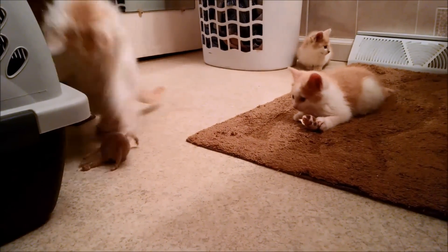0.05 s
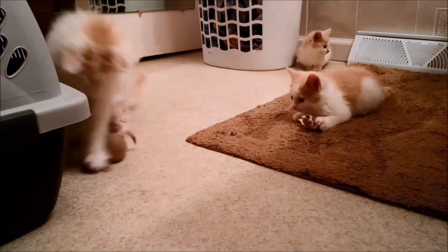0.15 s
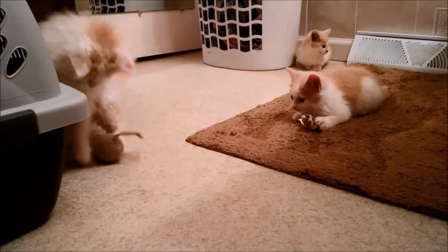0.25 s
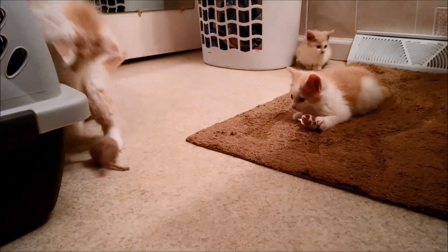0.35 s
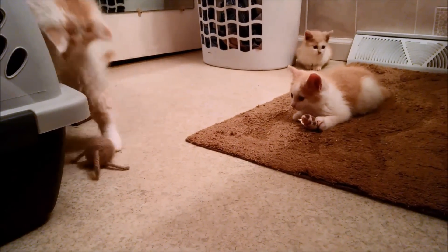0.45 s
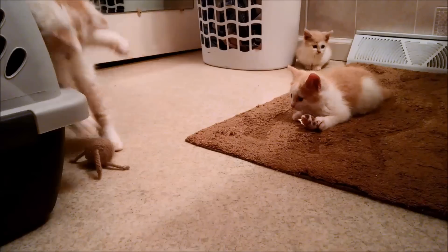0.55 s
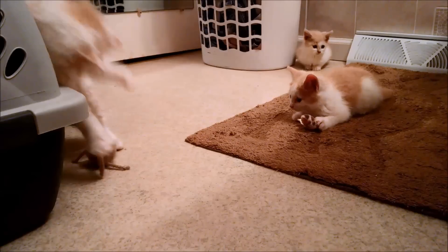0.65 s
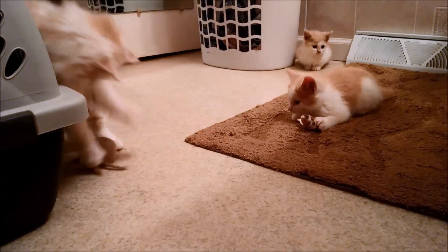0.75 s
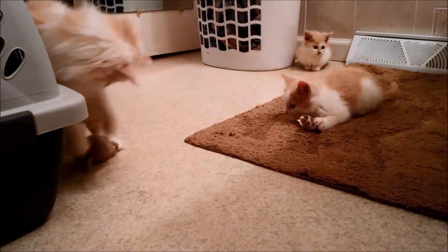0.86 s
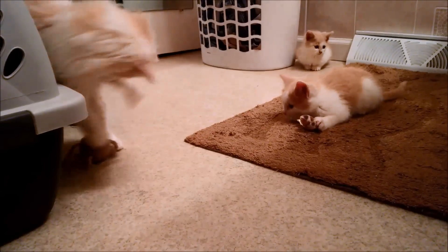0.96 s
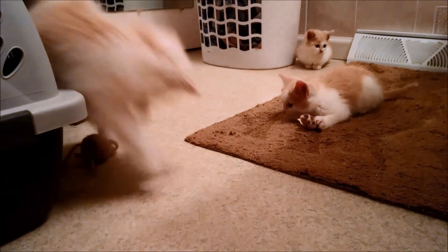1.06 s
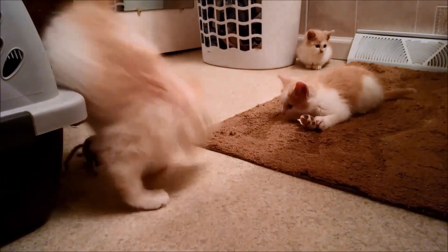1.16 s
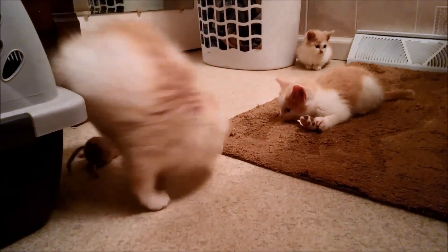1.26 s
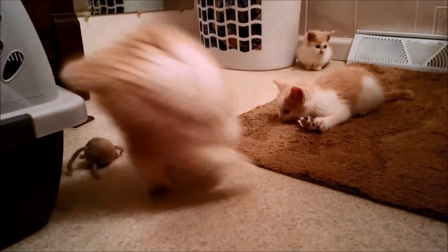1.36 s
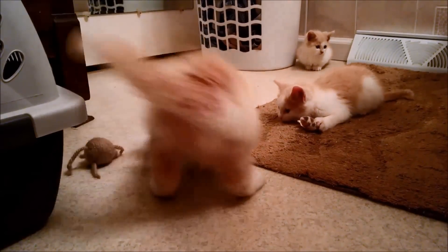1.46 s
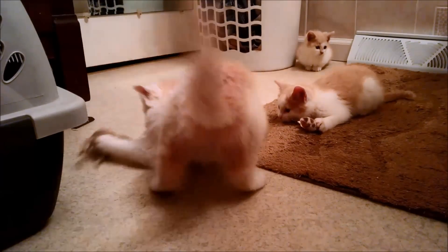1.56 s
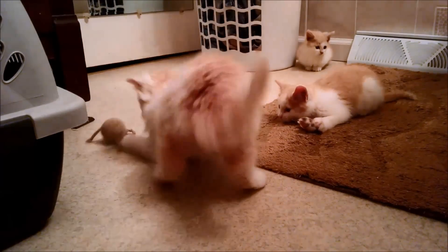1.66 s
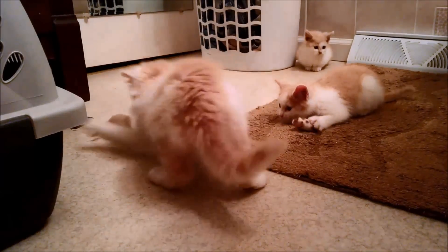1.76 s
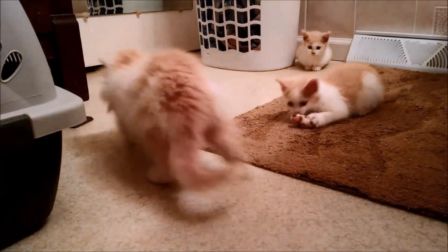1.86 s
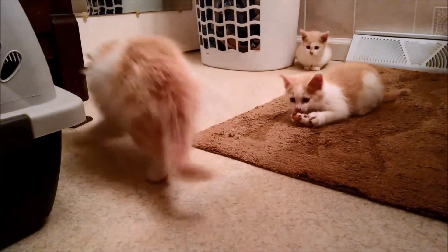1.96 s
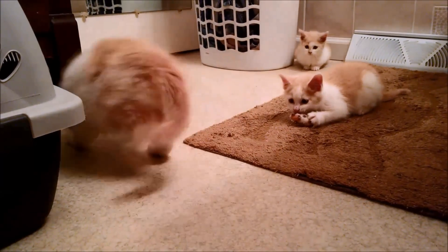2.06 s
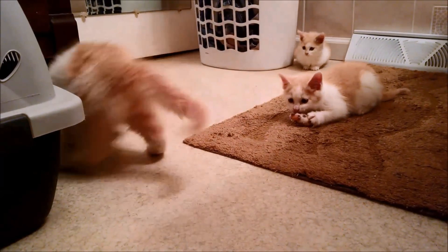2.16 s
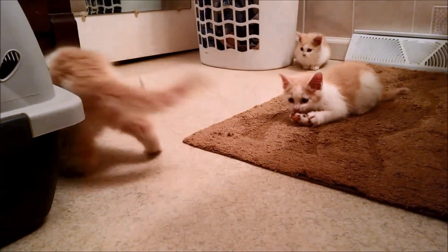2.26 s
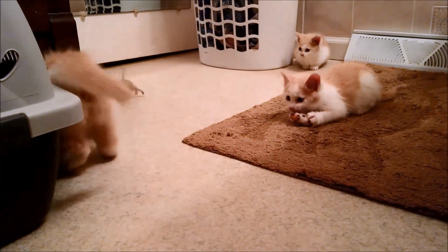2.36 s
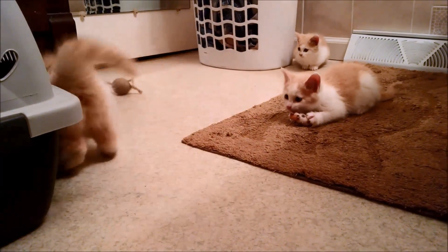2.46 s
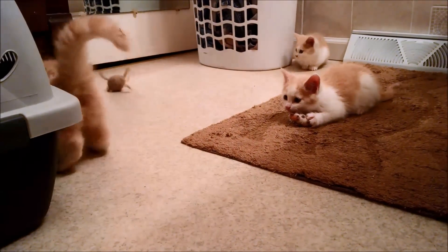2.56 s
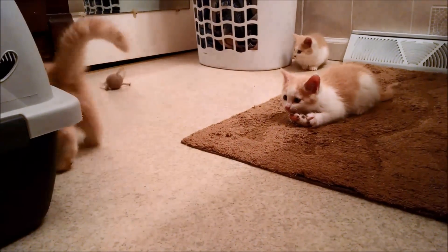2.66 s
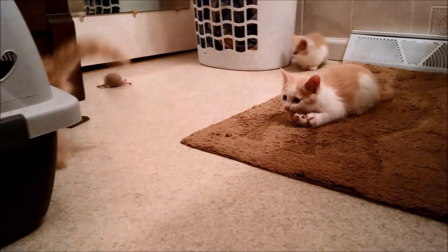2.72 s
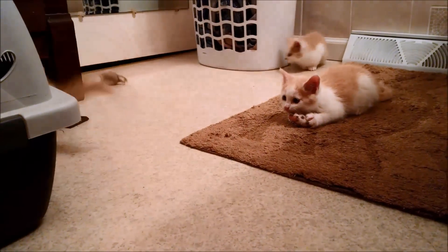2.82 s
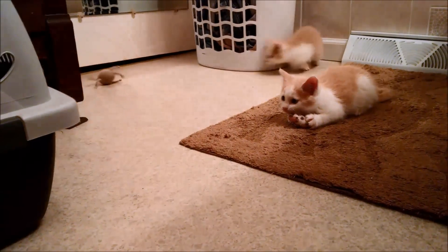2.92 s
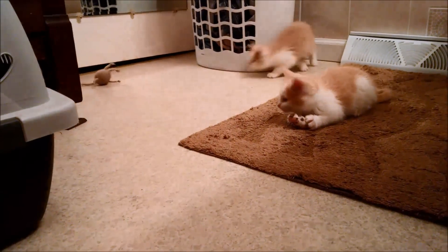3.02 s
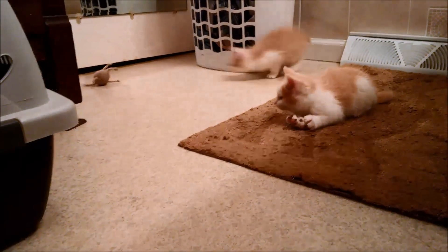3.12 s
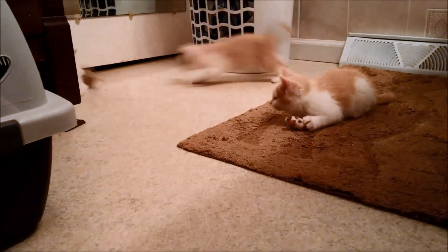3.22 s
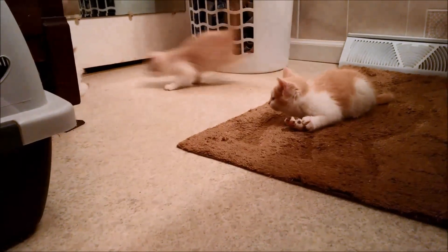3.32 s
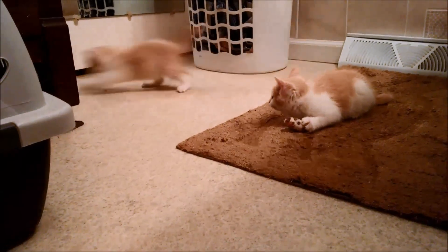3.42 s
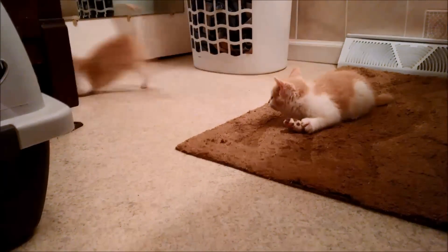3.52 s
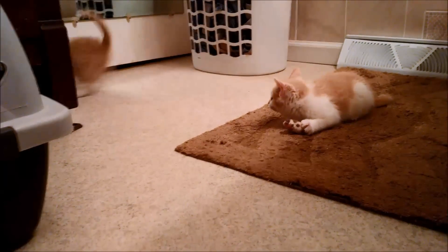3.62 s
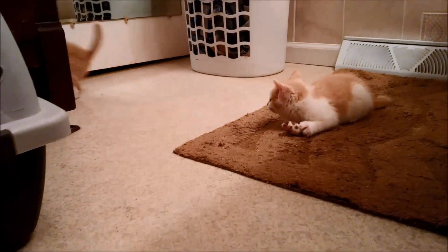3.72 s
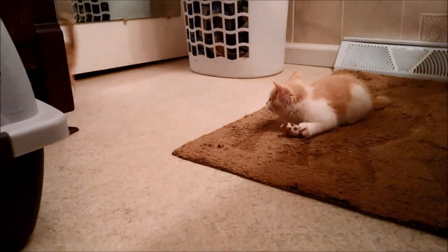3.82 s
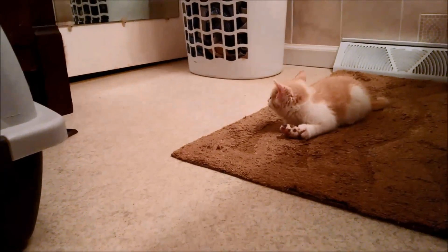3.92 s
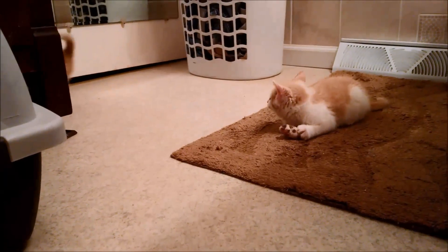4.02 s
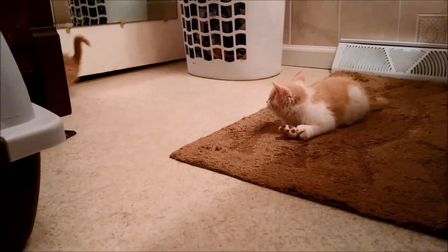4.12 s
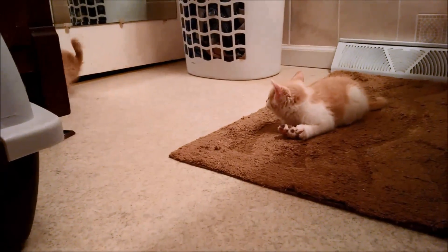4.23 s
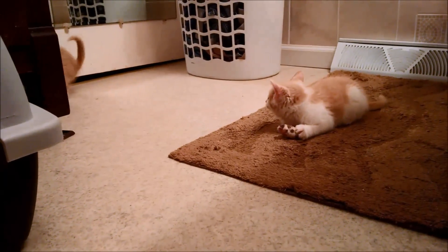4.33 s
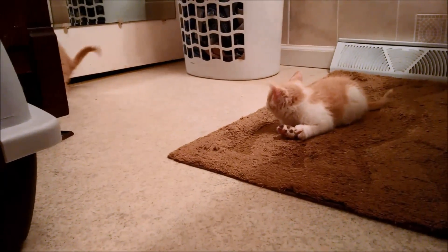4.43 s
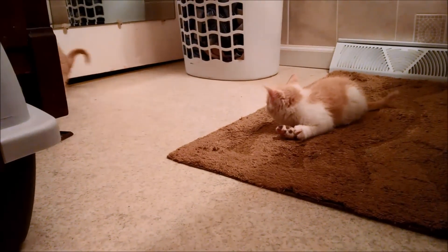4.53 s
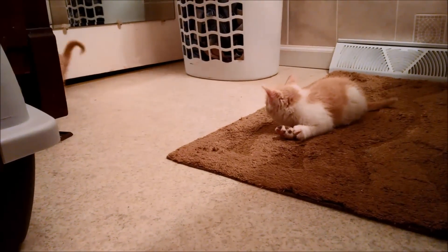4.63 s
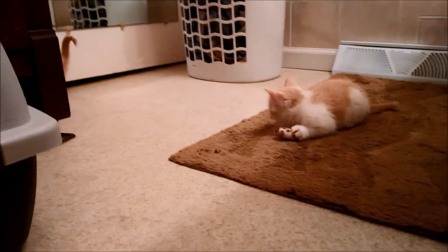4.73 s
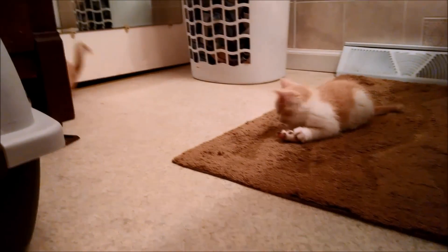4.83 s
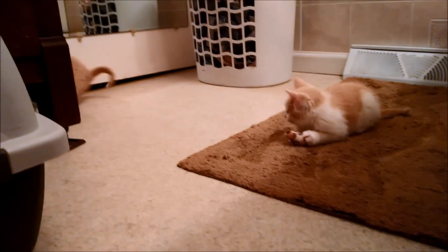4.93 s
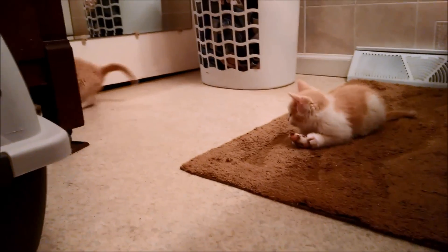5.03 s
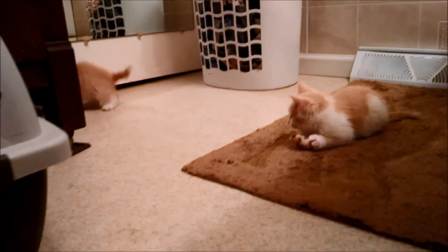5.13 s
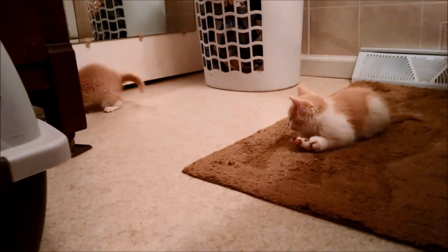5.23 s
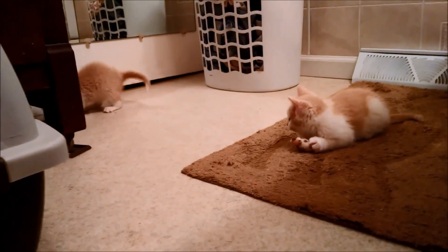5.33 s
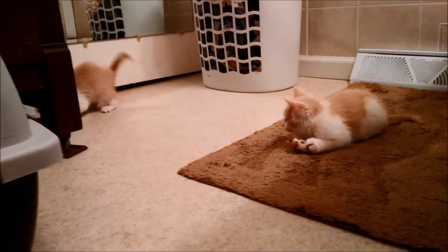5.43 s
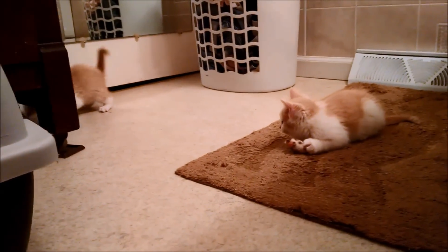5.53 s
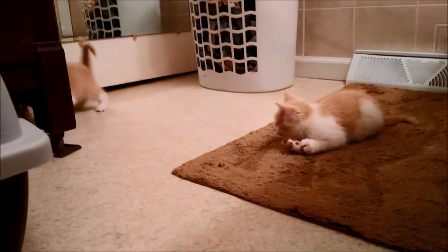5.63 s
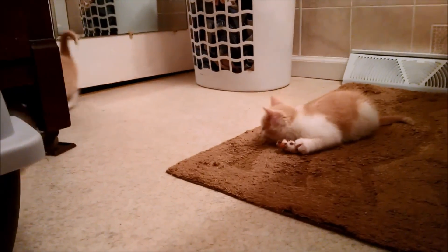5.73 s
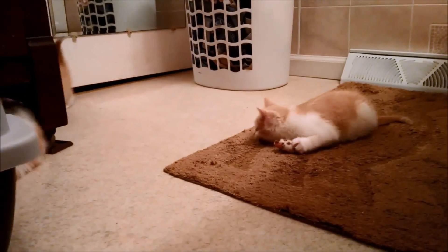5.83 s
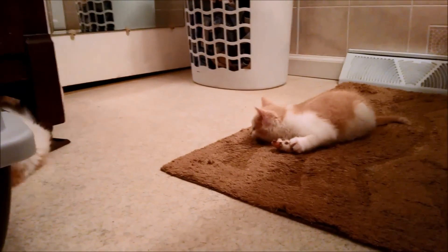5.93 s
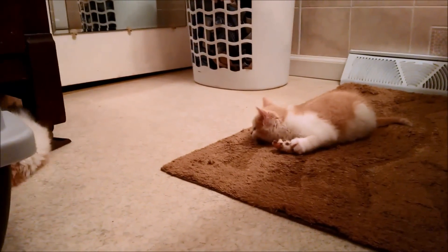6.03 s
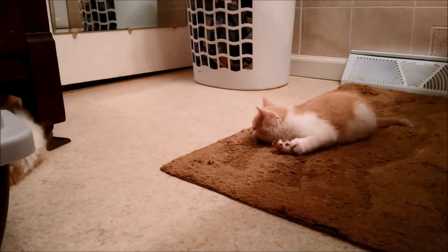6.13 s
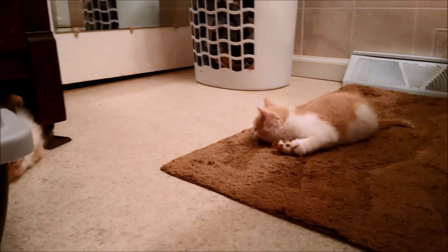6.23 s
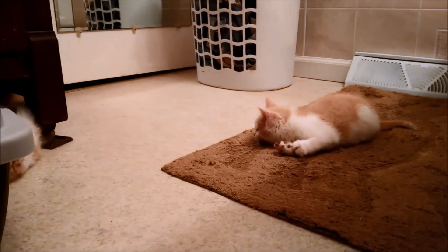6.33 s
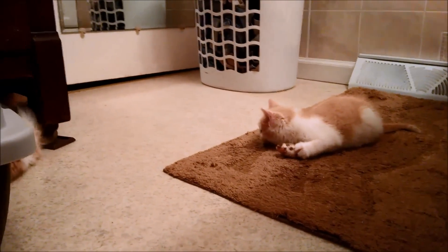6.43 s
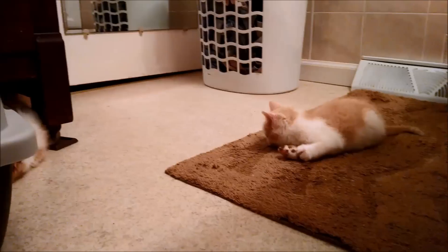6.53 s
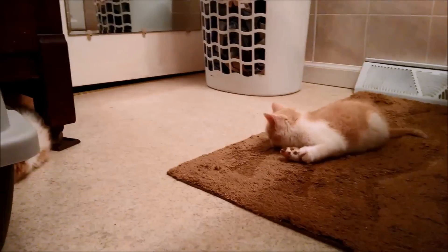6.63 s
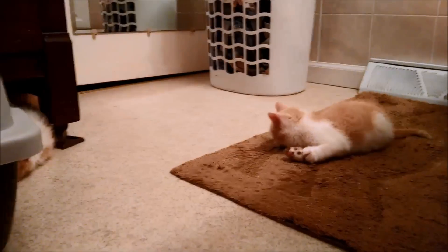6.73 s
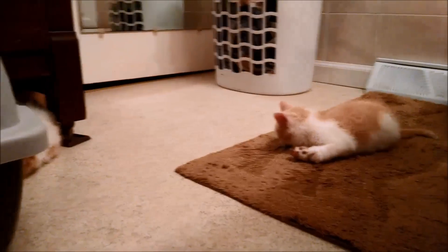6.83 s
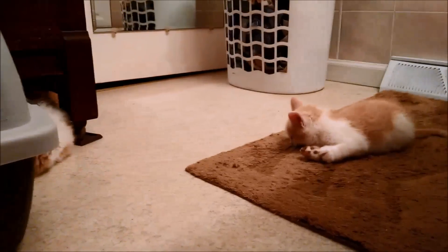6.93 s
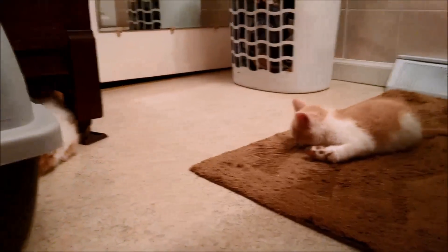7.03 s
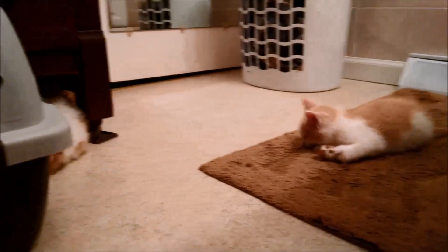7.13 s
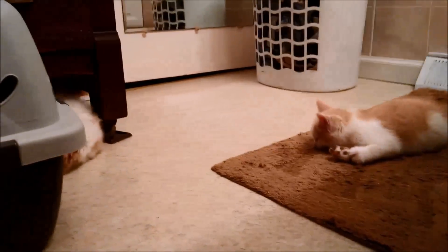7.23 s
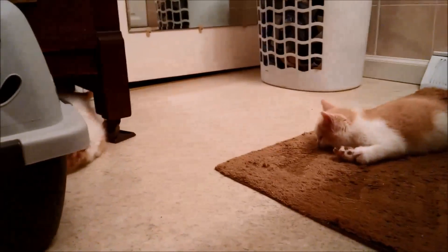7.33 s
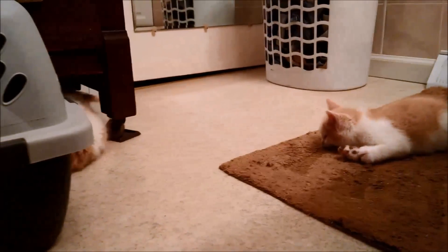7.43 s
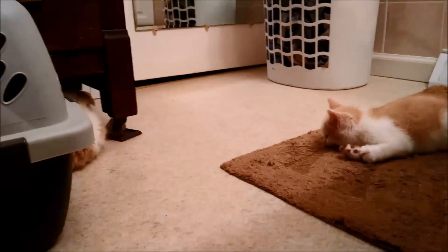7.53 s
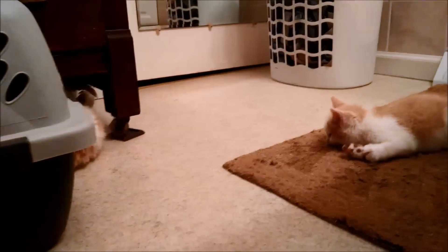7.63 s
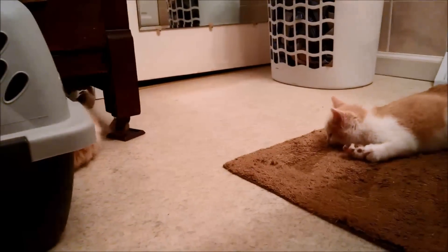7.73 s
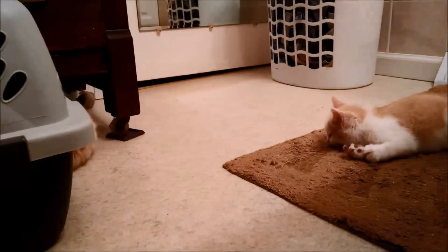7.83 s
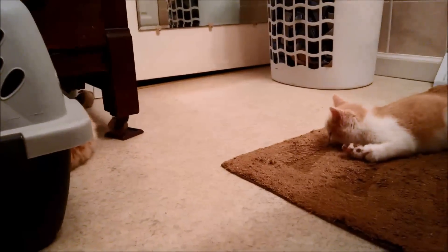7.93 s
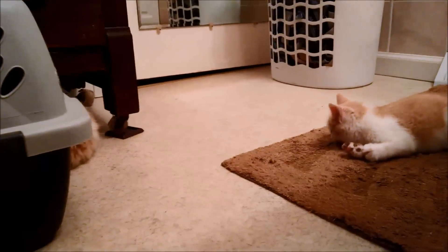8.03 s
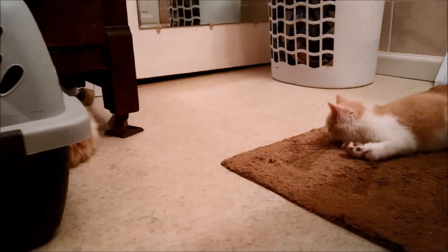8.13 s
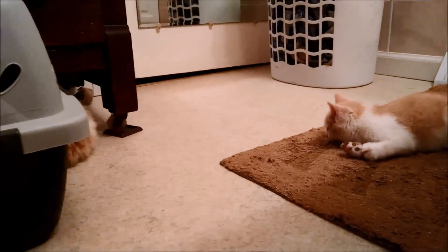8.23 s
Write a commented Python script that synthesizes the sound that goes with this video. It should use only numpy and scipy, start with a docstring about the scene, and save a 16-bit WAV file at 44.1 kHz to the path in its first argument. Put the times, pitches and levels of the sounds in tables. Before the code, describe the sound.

Kittens scuffle on a bathroom floor with dull thumps and gritty claw scrapes, sharp handling crackles at the right, over low hum and hiss.

```python
"""Soft thumps and gritty scrapes of kittens scuffling on a bathroom floor, crackles at the right, over house hum and air.
Paws push the floor and ring its modes; claws and toys are rough noise through resonances, and tiled walls answer both.
A finger shifting over the casing by the right microphone port is hissing noise with sharp ticks.
The camera widens its stereo by taking a late copy of each channel from the other."""
import sys
import numpy as np
from scipy import signal
from scipy.fft import rfft, irfft, next_fast_len
from scipy.io import wavfile
from scipy.ndimage import uniform_filter1d, map_coordinates

SR = 44100
rng = np.random.default_rng(int(sys.argv[2]) if len(sys.argv) > 2 else 0)


def bounce(signal):
    """Save signal as a 16-bit WAV file at the path given by the first command-line argument."""
    frames = np.transpose(np.atleast_2d(signal))
    limited = np.clip(frames, -1, 1)
    pcm = np.round(limited * 32767).astype(np.int16)
    wavfile.write(sys.argv[1], SR, pcm)


N = 364707

# sudden slips of the finger: (time [s], level [dB], held [s])
SLIPS = [(1.669, -35.5, 0.03), (1.7978, -38.5, 0.027), (1.946, -40.5, 0.012), (2.046, -40.5, 0.03),
         (2.254, -57, .004), (2.287, -42, 0.0073), (2.468, -42.5, 0.022), (2.556, -39.5, 0.015),
         (2.606, -40.5, 0.02), (2.672, -33, 0.004), (2.743, -40.5, 0.028), (2.786, -52, 0.0054),
         (3.34, -62, 0.011), (3.35, -39.5, 0.013), (3.4251, -36, 0.051), (3.499, -30.5, 0.041),
         (3.7345, -51, 0.024), (3.957, -46, 0.011), (4.7511, -43.5, 0.048), (6.5994, -49, 0.0072),
         (6.61, -53, .01), (6.7326, -50.5, .01), (7.416, -52.5, .01)]


def amp(db):
    """Decibels to gain."""
    return 10 ** (np.asarray(db) / 20)


def unit(x):
    """Scaled to rms 1 over all channels."""
    return x / np.sqrt(np.mean(x ** 2) + 1e-20)


def along(points, hz):
    """Reads a curve of (Hz, value) points on a log frequency axis."""
    f, v = np.transpose(points)
    return np.interp(np.log(hz + 1), np.log(f + 1), v)


def filtered(x, response):
    """Shapes x by a complex response of frequency."""
    n = x.shape[-1]
    padded = next_fast_len(n + 8192)
    spectrum = rfft(x, padded) * response(np.fft.rfftfreq(padded, 1 / SR))
    return irfft(spectrum, padded)[..., :n]


def peak(f, hz, width):
    """Response of one causal resonance with its centre and width in Hz."""
    return 1j * f * width / (hz * hz - f * f + 1j * f * width)


def modes(f, table, extra_db=0):
    """A body's resonances with alternating polarity, each with a new random strength."""
    gain = amp(np.transpose(table)[2] + extra_db + rng.normal(0, 2.5, len(table)))
    return sum((-1) ** k * gain[k] * peak(f, hz, width) for k, (hz, width, _) in enumerate(table))


def wobble(rate):
    """A smooth random curve with this many knots a second."""
    knots = rng.standard_normal(int(N * rate / SR) + 4)
    return map_coordinates(knots, [np.arange(N) * rate / SR])


def patchy(x, depth_db):
    """Gives x patches of random gain, about 1.4 kHz by 30 ms, and rms 1."""
    z = signal.stft(x, nperseg=256)[2]
    field = uniform_filter1d(rng.standard_normal(z.shape[1:]), size=8, axis=0)
    field = uniform_filter1d(field, size=10, axis=1)
    return unit(signal.istft(z * amp(depth_db * unit(field)), nperseg=256)[1][:, :N])


def ports(x):
    """Turns two unrelated signals into left and right: long waves reach both ports alike."""
    # width of room sound: (frequency [Hz], side minus mid [dB])
    apart = [(50, -6), (150, -13.5), (500, -4.5), (1200, 1)]
    # balance of room sound: (frequency [Hz], left minus right [dB])
    lean = [(60, 4), (150, -0.5), (380, -1), (950, -10), (2380, 13), (5980, -19), (15000, -14)]
    mid, side = filtered(x, lambda hz: np.array([1 + 0 * hz, amp(along(apart, hz))]))
    left_right = np.array([mid + side, mid - side])
    return filtered(left_right, lambda hz: amp(along(lean, hz) * np.array([[.5], [-.5]])))


def add(track, s, sound):
    """Mixes a sound into the track at time s."""
    part = track[..., round(s * SR):][..., :sound.shape[-1]]
    part += sound[..., :part.shape[-1]]


def dying(t, t60, rise):
    """An envelope with a quick rise and an exponential fall of 60 dB in t60."""
    return (1 - np.exp(-t / rise)) * amp(-60 * t / t60)


def house():
    """Air noise and resonated-noise tones, a wavering motor sine, and the hiss of each capsule."""
    # spectrum of the air noise: (frequency [Hz], relative density [dB per Hz])
    air_spectrum = [(18, -72), (34, -6), (86, 0), (125, 2), (316, -5), (351, -4), (490, -5), (535, -11),
                    (605, -9), (1030, -20.5), (2000, -32), (2600, -43.5), (4400, -120)]
    # wavering tones of the house, the motor first: (frequency [Hz], width [Hz], level [dB])
    hum = [(55.9, 2, -55), (120.1, 9.4, -53), (170.4, 12.5, -53), (290.5, 25, -64), (316.6, 12.6, -57),
           (472, 14, -62.5), (502, 7.8, -60), (618, 7.7, -65), (711.1, 14.5, -66.5), (544.2, 17, -64)]
    # spectrum of the capsule noise: (frequency [Hz], relative density [dB per Hz])
    hiss_spectrum = [(300, 21.5), (1500, -5), (2500, 2.5), (5000, 1), (10000, 2), (16000, -3)]
    # slow course of the air noise: (time [s], level [dB])
    draught_course = [(0, -49), (3.1, -46.5), (7, -48.5), (8.27, -49.5)]

    def noise():
        return rng.standard_normal((2, N))

    air = unit(filtered(noise(), lambda hz: amp(along(air_spectrum, hz))))
    s, db = np.transpose(draught_course)
    draught = amp(np.interp(np.arange(N) / SR, s, db) + 1.1 * wobble(3.74))
    tones = sum(amp(db) * unit(filtered(noise(), lambda f: peak(f, hz, width) ** 2))
                for hz, width, db in hum[1:])
    hz, width, db = hum[0]
    motor_hz = hz + width / 4 * wobble(2.71)
    motor = amp(db + wobble(1.43)) * np.sin(2 * np.pi * np.cumsum(motor_hz) / SR)
    hiss = unit(filtered(noise(), lambda hz: amp(along(hiss_spectrum, hz))))
    around = ports(draught * patchy(air, depth_db=1.68) + tones)
    return around + motor * amp([[3.5], [1]]) + amp(-58.0) * hiss


def paws():
    """Each landing pushes the floor once, then shakes it: a dull thump at its centre and the modes near it."""
    # paws landing: (time [s], level [dB], centre [Hz])
    thuds = [(0.206, -22.5, 152), (0.213, -22.5, 273), (0.348, -23.5, 145), (0.357, -31, 272),
             (0.382, -31, 335), (0.687, -26.5, 155), (0.723, -23.5, 278), (1.263, -26, 258),
             (1.282, -26, 278), (1.311, -37, 280), (1.545, -27.5, 293), (1.572, -30, 274),
             (1.826, -29.5, 97), (2.325, -33.5, 90), (2.49, -22, 212), (2.669, -31, 133), (2.81, -28, 203),
             (2.909, -34, 129.8), (3.088, -21.5, 168), (3.107, -31, 258), (3.169, -20, 160),
             (3.19, -20, 277), (3.559, -21.5, 185), (3.582, -31.5, 270), (3.634, -26, 296),
             (3.898, -34.5, 500), (4.516, -29, 345), (4.524, -34, 287), (4.545, -34, 300),
             (5.939, -40.5, 470), (6.069, -34, 122), (6.61, -34.5, 78.1)]
    # modes of the floor: (frequency [Hz], width [Hz], level [dB])
    floorboard = [(84.5, 7.9, 3.5), (128, 23.6, 0.5), (178.3, 57, -1), (190.7, 12.5, -0.5), (271, 20, -2),
                  (293, 21.7, 3.5), (341, 48, -4), (379, 220, -6), (475, 22, -4.5), (800, 85, -29)]
    push_cycles = 0.34  # a paw presses for this part of a cycle of its centre frequency
    shake_t60_s = 0.18
    out, t = np.zeros((2, N)), np.arange(SR // 2) / SR
    for s, db, hz in thuds:
        shake = rng.standard_normal((2, len(t))) * dying(t, shake_t60_s, 0.0005) / 7
        push = np.sin(np.pi * (t * hz / push_cycles).clip(0, 1)) ** 2
        add(shake[0], 0, 1.44 * push * hz / 280)
        # modes far from the centre are weaker
        near_db = -4.2 * np.log2(np.transpose(floorboard)[0] / hz) ** 2
        spot = amp(rng.normal(0, 0.46))  # each spot of the floor rings a little higher or lower

        def floor(f):
            return modes(f / spot, floorboard, near_db) + amp(-6.5) * peak(f, hz, hz / 3)

        ring = filtered(shake, floor)
        ring[1] -= 0.2 * ring[0]  # a little of the push, inverted, tips the balance between the ports
        add(out, s, ring / np.abs(ring[0]).max() * amp(db))
    return ports(out)


def scuffs():
    """Short lumpy scrapes after a snap at first touch, through the hollow body and the bright claw tips."""
    # claws and toys scraping the floor: (time [s], level [dB], t60 [s],
    #   brightness of the body [dB per octave], grit over body [dB], snap over scrape [dB])
    scrapes = [(0.206, -33, 0.046, -4, -18, 18.5), (0.242, -30, 0.13, -8.5, -33, 10),
               (0.384, -36, 0.15, 14.5, -5, 12), (0.695, -37, 0.22, 11, -11.5, 13),
               (0.72, -25.5, 0.089, -1, -23, 16), (1.261, -36, 0.082, 5, -6, 3),
               (1.278, -25, 0.077, 0, -27, 17.5), (1.548, -31, 0.051, 6, -12, 18.5),
               (1.613, -44.5, 0.16, 11.5, -8.5, 20.5), (3.189, -31.5, 0.2, 9, -5.5, 6),
               (3.359, -40.5, 0.4, 3, -3.5, 5), (3.559, -27, 0.098, 0, -10, 8),
               (3.638, -31, 0.13, 6, -18, 12), (3.899, -34, 0.19, -3, -27, -7),
               (4.515, -35.5, 0.3, 16, -4, 10), (4.686, -35.5, 0.2, 12, -7.5, 8),
               (4.729, -31, 0.19, 3, -3.5, 3), (4.746, -33.5, 0.11, 11, -4, 6),
               (4.998, -29.5, 0.11, -2, -22, 8), (5.022, -35.5, 0.24, 9, -5, 10),
               (5.137, -37, 0.21, -9, -1.5, 4), (5.589, -39, 0.097, 12, -10, -3),
               (5.947, -42.5, 0.1, -20, -2, 10), (6.142, -39, 0.36, 4, -0.5, -6),
               (6.597, -32, 0.13, -1, 0, -2), (6.61, -25, 0.18, 4, -12, 8), (7.418, -43, 0.16, -14, -2, 5),
               (7.688, -49, 0.14, -1, -2, 4)]
    # body of what is scraped: (frequency [Hz], width [Hz], level [dB])
    toy = [(523, 230, 0), (912, 335, 1.5), (1250, 214, 1), (1414, 570, 0.5), (1780, 1730, -6)]
    # claw tips: (frequency [Hz], width [Hz], level [dB])
    claw_tips = [(3040, 1580, 3.5), (3580, 3000, 1.5), (4410, 1560, 0), (7370, 1400, -2.5),
                 (9900, 1000, -3)]
    out, t = np.zeros((2, N)), np.arange(SR // 3) / SR
    for s, db, t60, tilt_db, grit_db, snap_db in scrapes:
        spot = amp(rng.normal(0, 0.49))  # each grip shifts the body's ring a little
        # a new random gain every 90 samples, about 2 ms
        lumps = amp(3.6 * rng.standard_normal(len(t) // 90 + 1).repeat(90)[:len(t)])
        snap = amp(snap_db) * dying(t, 0.0086, 0.0011)
        rough = rng.standard_normal((2, len(t))) * (lumps * dying(t, t60, 0.0045) + snap)
        bright_db = tilt_db * np.log2(np.transpose(toy)[0] / 1100)

        def hollow(f):
            soft = (1 + 1j * f / 2600) ** 2  # the soft body loses treble
            return modes(f / spot, toy, bright_db) / soft

        body = filtered(rough, hollow)
        grit = filtered(rough, lambda f: modes(f, claw_tips))
        add(out, s, (body + amp(grit_db) * grit) * amp(db))
    return out


def room(x):
    """The tiled walls answer with a short dying tail of noise."""
    t60_s, level_db, delay_s = 0.31, -4.5, 0.0066
    t = np.arange(SR // 2) / SR
    tail = rng.standard_normal((2, len(t))) * amp(-60 * t / t60_s) * (t > delay_s)
    tail /= np.linalg.norm(tail[0])
    return x + amp(level_db) * signal.fftconvolve(x, tail, axes=1)[:, :N]


def strokes():
    """Level of the rubbing: each stroke swells, drifts from its first to its last level, and fades."""
    # strokes of the finger: (full pressure from [s], held [s], level at first [dB], level at last [dB])
    rubs = [(.31, 0.35, -56.5, -55), (.9, 0.26, -55.5, -55), (1.45, 0.059, -61.5, -63),
            (1.79, 0.18, -38.5, -42), (2.1, 0.22, -38.5, -30), (2.422, 0.058, -40, -37.5),
            (2.573, 0.15, -42.5, -44.5), (2.81, 0.28, -39, -43), (3.38, 0.013, -35, -41),
            (3.633, 0.34, -38.5, -34.5), (4.02, 0.28, -45.5, -49), (4.47, 0.094, -41.5, -47),
            (4.76, 0.14, -51.5, -45), (5.07, 0.22, -49.5, -59), (5.48, 0.016, -52, -57.5),
            (5.6, 0.041, -51, -48), (5.76, 0.28, -48, -60), (6.195, 0.13, -39, -46),
            (6.61, 0.074, -51.5, -55), (6.75, 0.096, -56, -51), (7.06, 0.029, -52, -47.5),
            (7.43, .02, -59, -66)]
    press_db_per_s, lift_db_per_s = 178, 165
    t, total = np.arange(N) / SR, np.zeros(N)
    for s, held, first_db, last_db in rubs:
        drift_db = np.interp(t, [s, s + held], [first_db, last_db])
        swell_db = -press_db_per_s * (s - t).clip(0)
        fade_db = -lift_db_per_s * (t - s - held).clip(0)
        total += amp(drift_db + swell_db + fade_db)
    return total


def sticking():
    """Gain of the rubbing: skin holds still before it slips, so the level sinks and is back as the slip starts."""
    stick_s, stick_db = 0.017, 1.5  # time constant and depth of one dip
    dip_db, before = np.zeros(N), np.arange(SR // 8, 0, -1) / SR
    for s, _, _ in SLIPS:
        add(dip_db, s - before[0], -stick_db * np.exp(-before / stick_s))
    return amp(dip_db)


def slips():
    """Level of the slips: each starts at once, holds a moment and dies."""
    rise_s, t60_s = .0015, 0.19
    out, t = np.zeros(N), np.arange(SR // 4) / SR
    for s, db, held in SLIPS:
        fall_db = -60 * (t - held).clip(0) / t60_s
        add(out, s, amp(db + fall_db) * (1 - np.exp(-t / rise_s)))
    return out


def finger():
    """Skin ridges catch on the casing: dense noise with sharp ticks, coloured by the port's resonance."""
    # colour of the rubbing: (frequency [Hz], relative density [dB per Hz])
    port = [(1500, -27.5), (4500, -26.5), (6500, -10.5), (9000, -2.5), (11200, 0.5), (13000, -3),
            (16000, -9)]
    # how sharply the skin catches: (time [s], relative level of small ticks [dB])
    sharpness = [(0, 4), (2.9, 2), (3.25, 0), (8.27, -21)]
    slipping = slips()
    flutter = amp(0.58 * wobble(30) + 0.69 * wobble(150))
    level = strokes() * sticking() * flutter + slipping
    # ticks a second: they crowd into the slips
    rate = 260 * amp(3.1 * wobble(25)) + 330 * slipping / (level + 1e-9)
    strength = amp(7 * rng.exponential(size=N).clip(0, 1.5))
    ticks = (rng.random(N) < rate / SR) * rng.choice([-1, 1], N) * strength
    crackle = amp(np.interp(np.arange(N) / SR, *np.transpose(sharpness)))
    bright_ticks = unit(np.diff(ticks, prepend=0))  # brighter than the hiss
    near = unit(rng.standard_normal(N) + 0.5 * crackle * bright_ticks)
    far = amp(-5.5) * rng.standard_normal(N) - 0.053 * near  # what the casing carries round to the left port

    def colour(hz):
        duller = amp(-8 * np.log2(hz / 7000 + 0.0089).clip(0, 2))  # the left port loses treble
        return amp(along(port, hz)) * np.array([duller, 1 + 0 * hz])

    return level * patchy(filtered(np.array([far, near]), colour), depth_db=2.05)


def catches():
    """Single loud ticks at the right port: very short bursts of a high tone."""
    # loudest catches of skin on the casing: (time [s], level [dB])
    loud_ticks = [(1.673, -5), (1.8133, -7), (1.824, -10), (1.8654, -16), (2.2563, -6), (2.29, -4),
                  (2.2949, -11), (2.302, -9), (2.482, -11), (2.5683, -7), (2.5778, -11), (2.6248, -10),
                  (2.6285, -4), (2.6406, -15), (2.706, -13), (2.7507, -7), (2.7581, -10), (2.7893, -7),
                  (2.8195, -15), (3.5053, -18)]
    tick_hz, tick_s = 12100, .0001  # middle pitch, half-width of the bell-shaped burst
    out, t = np.zeros((2, N)), np.arange(-40, 40) / SR
    for s, db in loud_ticks:
        hz = tick_hz * amp(rng.normal(0, 0.22))
        phase = 2 * np.pi * rng.random()
        burst = np.exp(-(t / tick_s) ** 2) * np.cos(2 * np.pi * hz * t + phase)
        add(out[1], s + t[0], amp(db) * burst)
    return out


def scene():
    """All sources at the two ports; the walls answer the paws and scuffs."""
    return house() + room(paws() + scuffs()) + finger() + catches()


def record(dry):
    """Each channel loses a late copy of the other, which widens the image; then the band limit."""
    # colour of the late copy: (frequency [Hz], level [dB])
    cross = [(100, -12), (1000, -4), (5000, 3.5), (8000, -15), (15000, -23)]
    delay_s, top_hz = 0.0003822, 15600
    late = filtered(dry[::-1], lambda hz: amp(along(cross, hz)) * np.exp(-2j * np.pi * hz * delay_s))
    return filtered(dry - late, lambda hz: hz < top_hz)


dry = scene()
out = record(dry)
bounce(out)
```